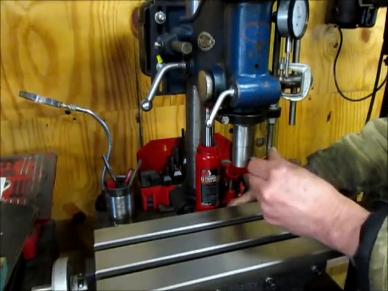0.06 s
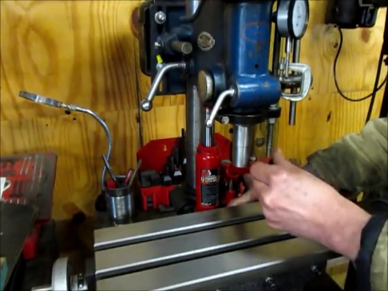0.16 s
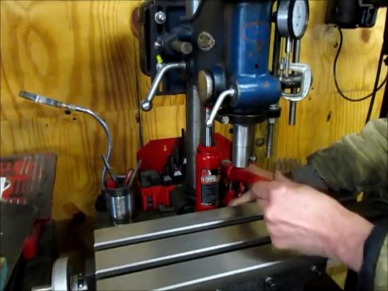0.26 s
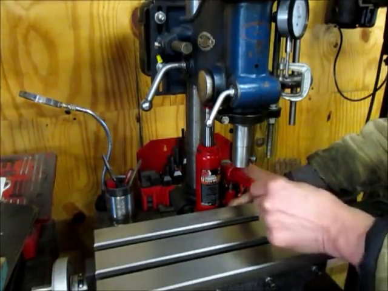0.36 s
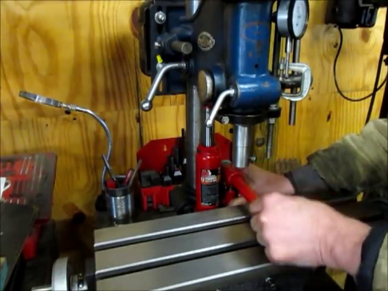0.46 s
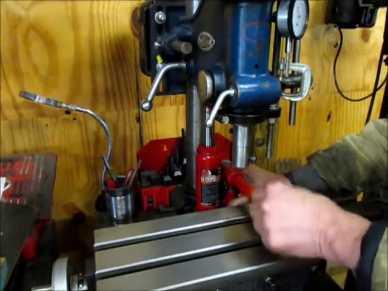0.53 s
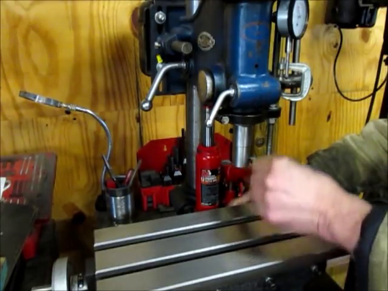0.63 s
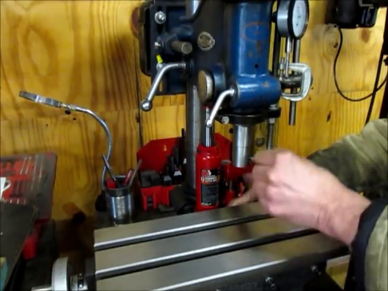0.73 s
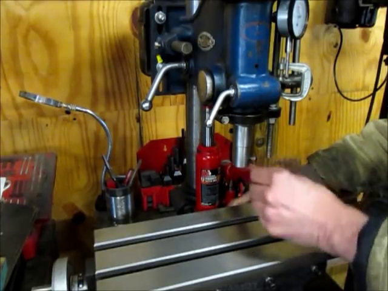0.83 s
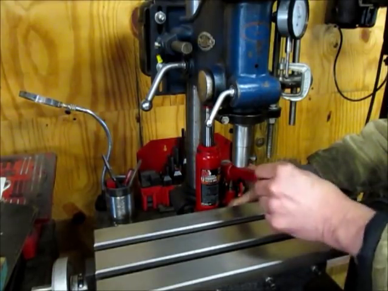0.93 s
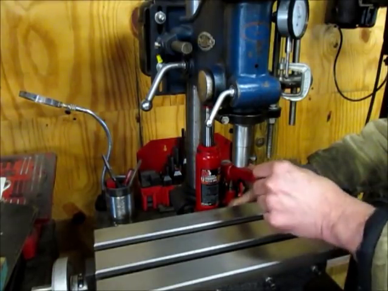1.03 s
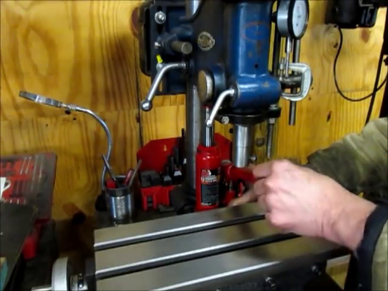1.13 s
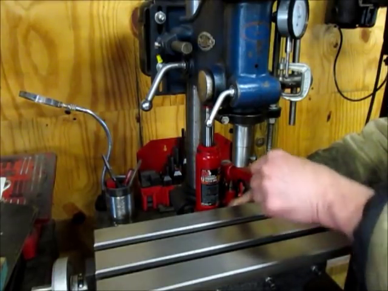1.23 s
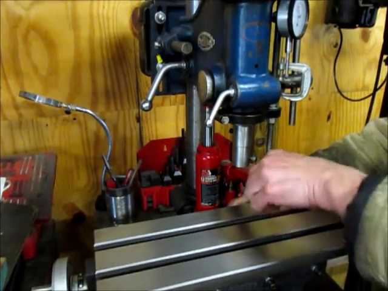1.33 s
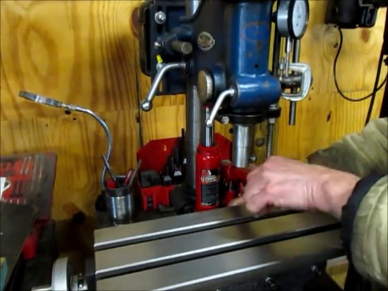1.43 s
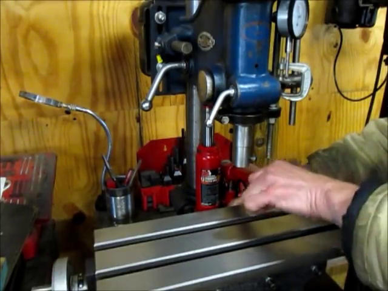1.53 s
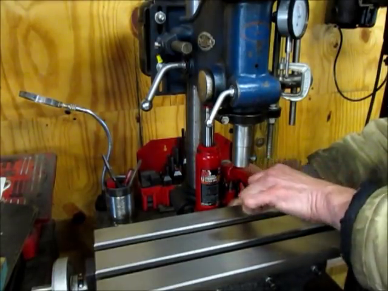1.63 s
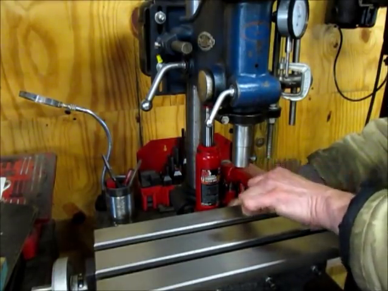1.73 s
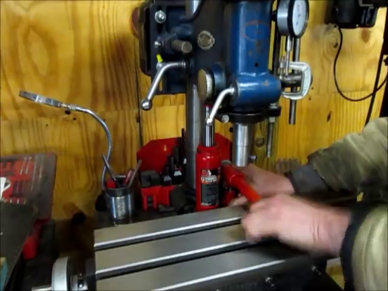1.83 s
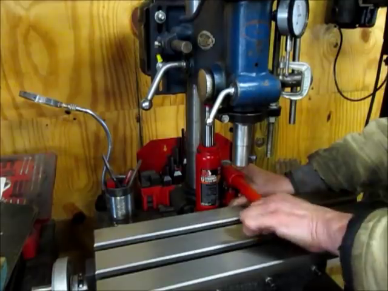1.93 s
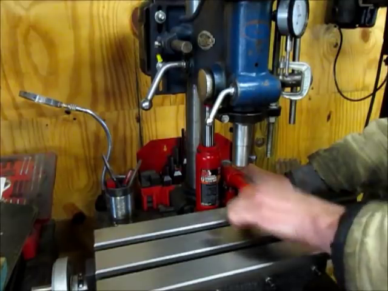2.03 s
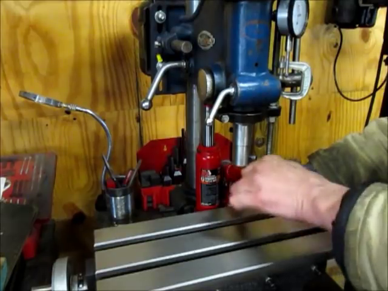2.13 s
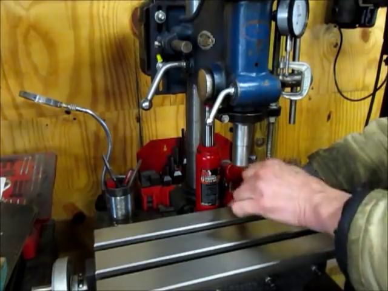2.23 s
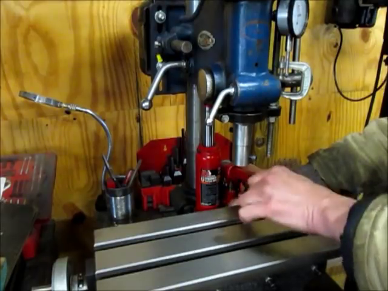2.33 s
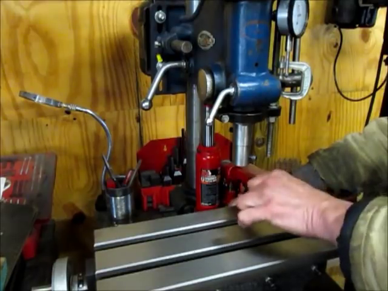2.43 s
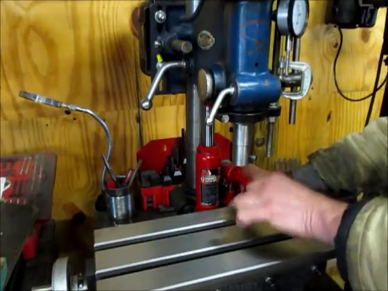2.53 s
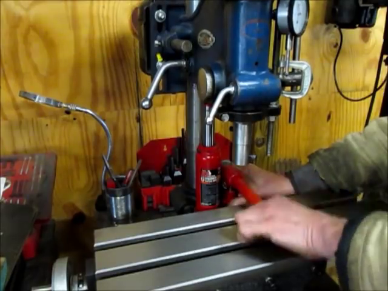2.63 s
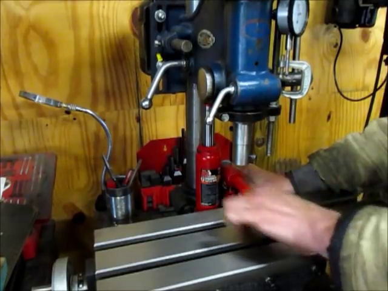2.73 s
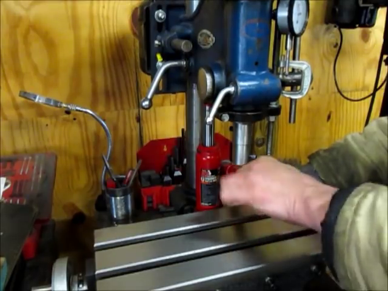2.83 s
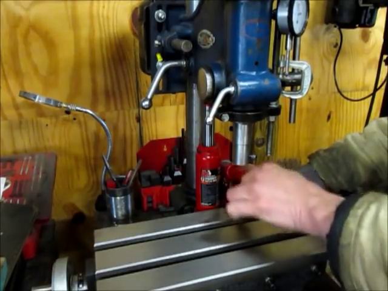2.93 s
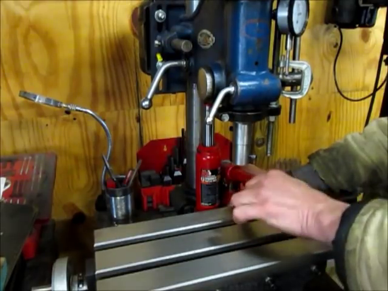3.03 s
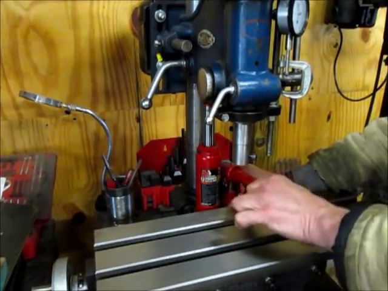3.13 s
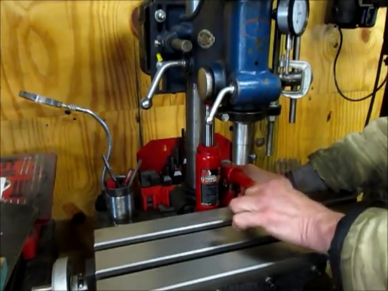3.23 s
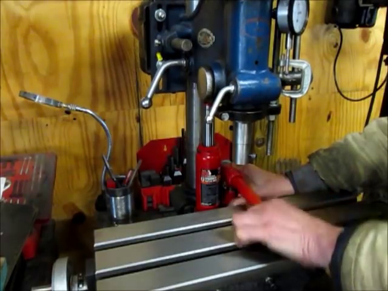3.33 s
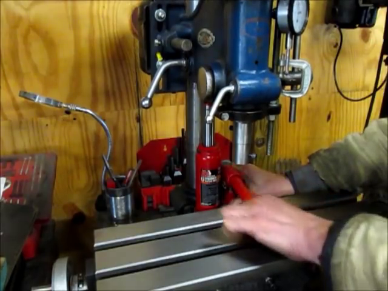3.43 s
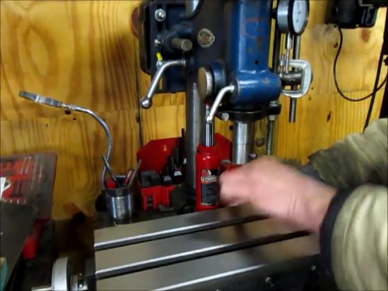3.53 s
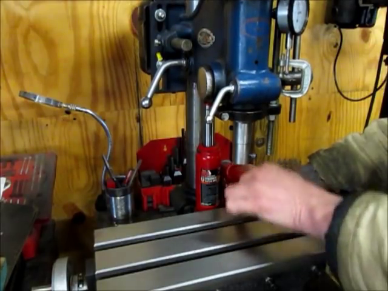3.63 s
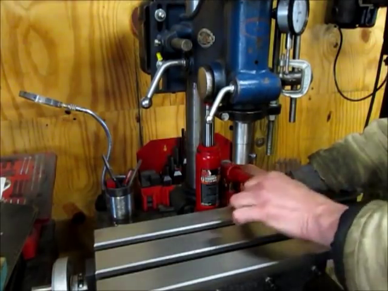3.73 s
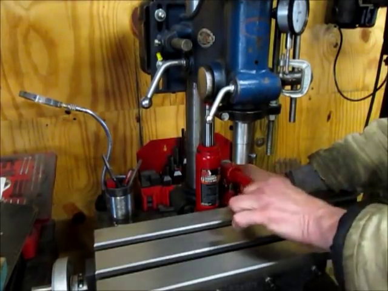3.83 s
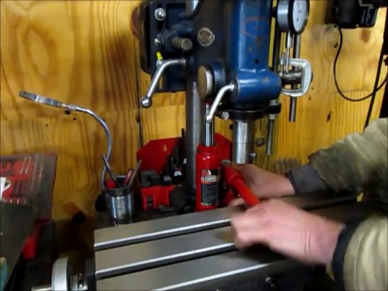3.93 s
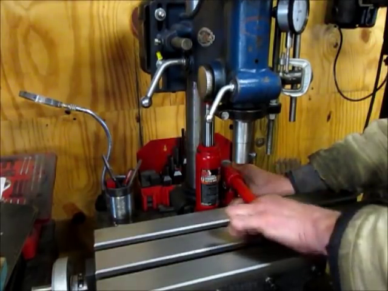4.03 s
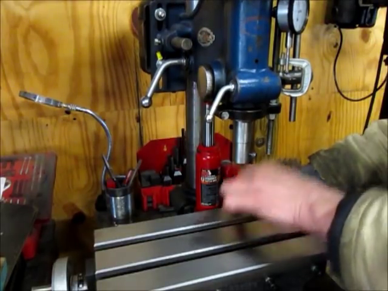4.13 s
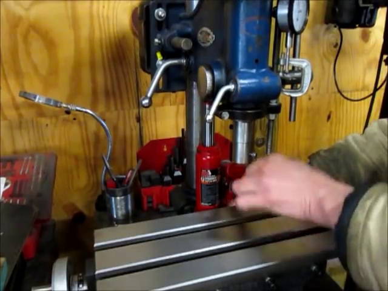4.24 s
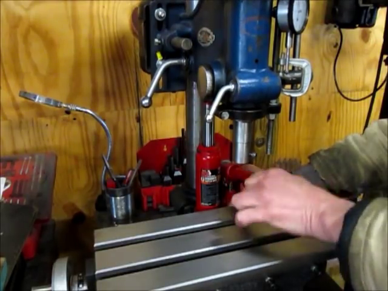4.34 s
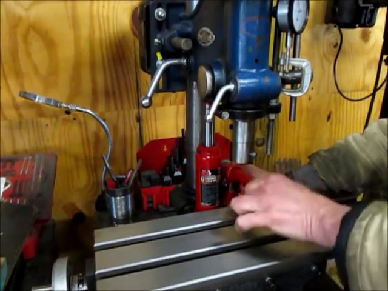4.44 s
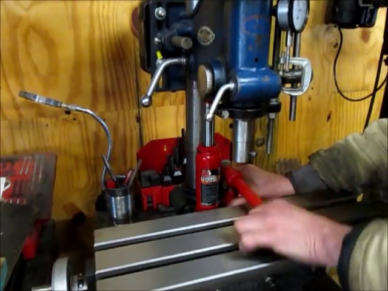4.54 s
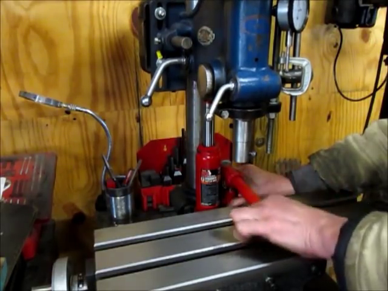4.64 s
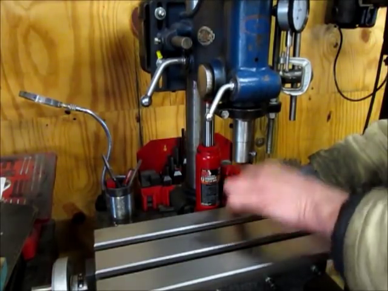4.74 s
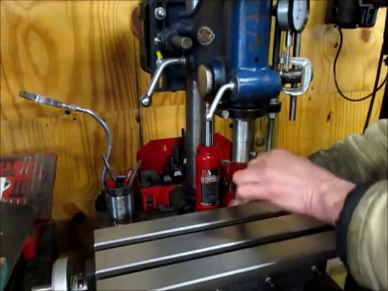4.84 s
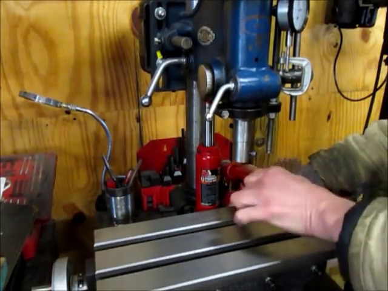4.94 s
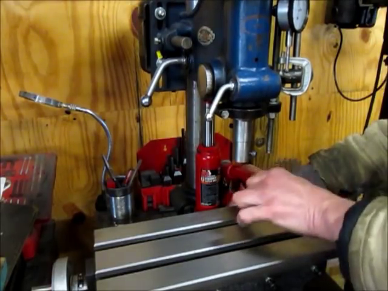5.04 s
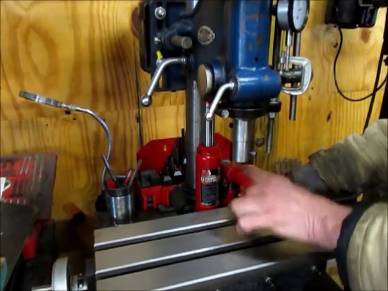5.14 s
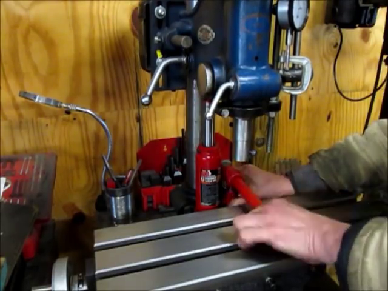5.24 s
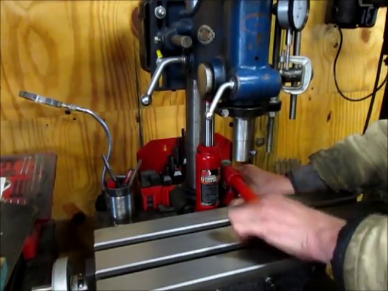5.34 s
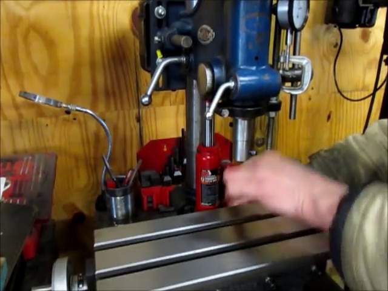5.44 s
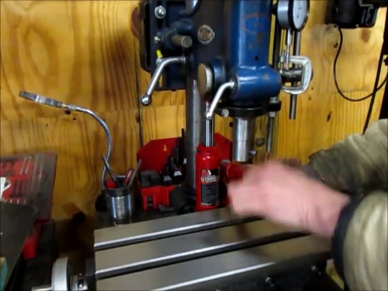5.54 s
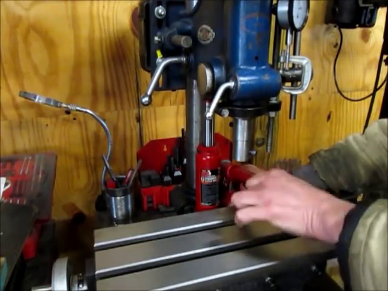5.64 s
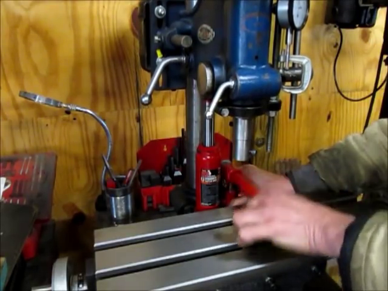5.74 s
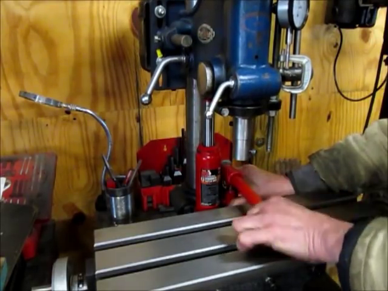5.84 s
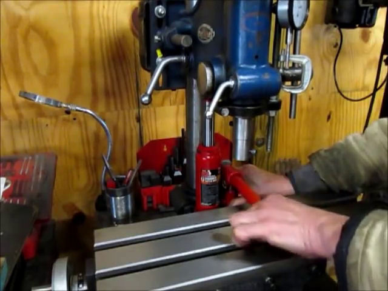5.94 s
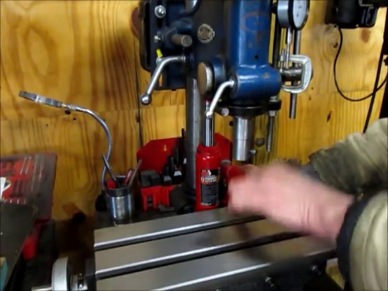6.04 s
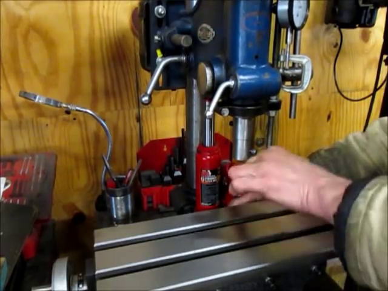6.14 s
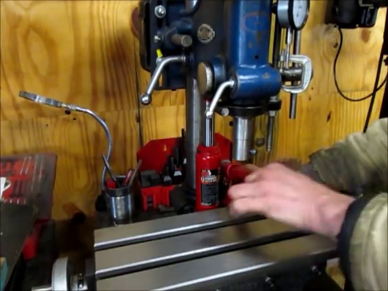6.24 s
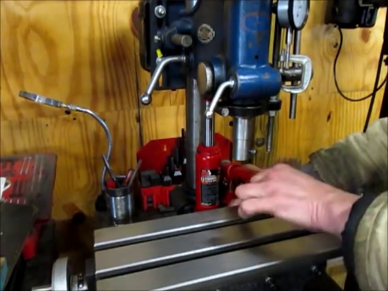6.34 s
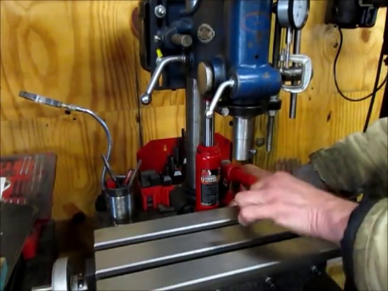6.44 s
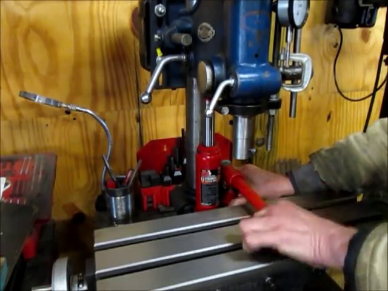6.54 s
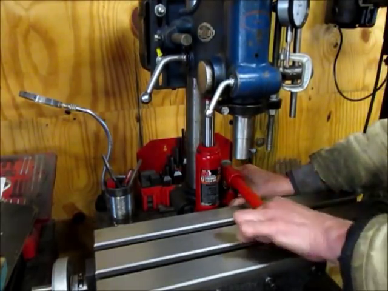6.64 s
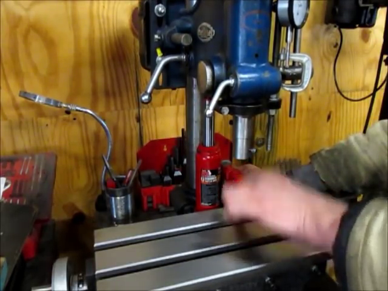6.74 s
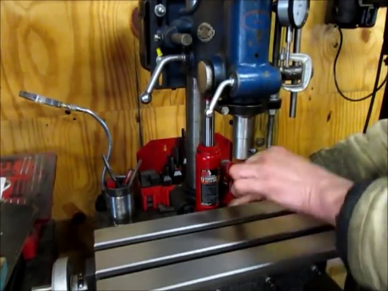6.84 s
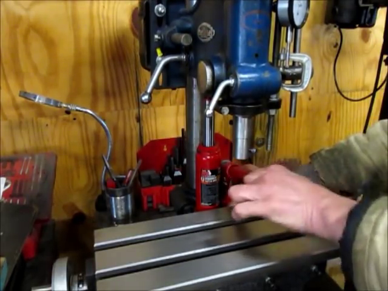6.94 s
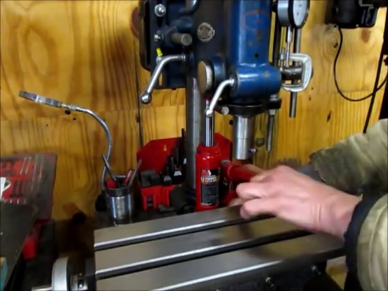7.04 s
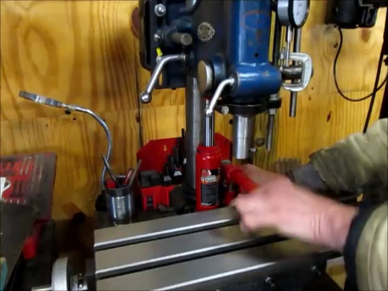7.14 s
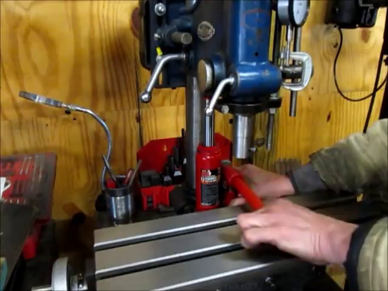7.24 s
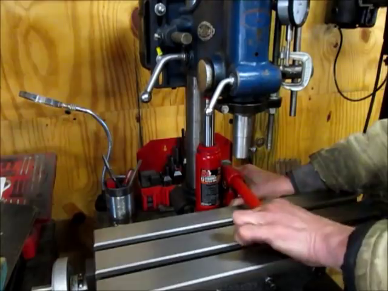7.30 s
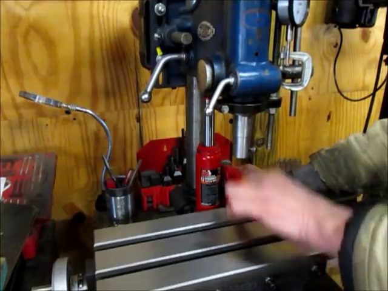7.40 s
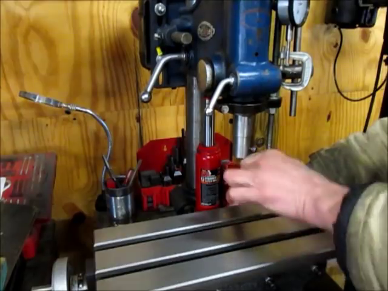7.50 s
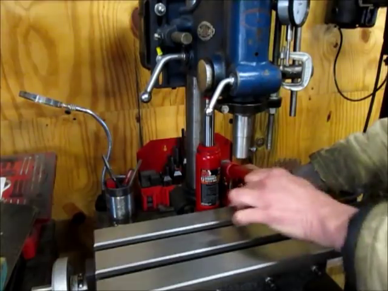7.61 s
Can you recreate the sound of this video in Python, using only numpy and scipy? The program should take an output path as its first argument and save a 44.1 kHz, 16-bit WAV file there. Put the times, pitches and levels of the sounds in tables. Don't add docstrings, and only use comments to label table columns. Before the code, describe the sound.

A hand pumps a small metal jack on a heavy machine bench, dull thuds and sharp metallic clacks with loose rattling between strokes.

```python
import sys
import numpy as np
from scipy import signal
from scipy.fft import rfft, irfft
from scipy.io import wavfile

SR = 44100
rng = np.random.default_rng(int(sys.argv[2]) if len(sys.argv) > 2 else 0)


def gain_from_db(level_db):
    decades = np.asarray(level_db, float) / 20
    return 10 ** decades


def inscribe(sig):
    pcm = np.round(np.clip(np.atleast_2d(sig).T, -1, 1) * 32767)
    wavfile.write(sys.argv[1], SR, pcm.astype(np.int16))


N = 338247
RING = np.arange(SR // 3) / SR

# (frequency [Hz], level [dB], t60 [s])
FRAME = [(290.2, 8.5, 0.34), (359, 17, 0.085), (404, 16.5, 0.068)]
UPPER = [(490.5, -3, 0.4), (536, -0.5, 0.22), (548.5, -3.5, 0.17), (595, -3, 0.073), (631.5, -5.5, 0.061)]
BENCH = [(94.7, 3, 0.32), (161.7, -5, 0.27), (204.3, -2, 0.34), (217.5, 1.5, 0.39)]
BODY = [(714, 2, 0.97), (795, 9.5, 0.035), (912, -7, 0.63), (945, 3, 0.56), (936, 2.5, 0.12),
        (1132, 0.5, 0.28), (1136, -16, 0.16), (1222, -10, 0.19), (1287, -0.5, 0.064), (1325, 1, 0.078)]
LINKS = [(1478, 10, 0.054), (1506, 5, 0.16), (1601, 5.5, 0.061), (1738, 7.5, 0.073), (2034, 10.5, 0.03),
         (2225, 2.5, 0.1), (2395, -1.5, 0.25), (2854, 0, 0.026), (3420, -27, .2)]
PINS = [(3470, -82, .2), (3870, 23.5, 0.47), (4200, 17, 0.025), (4760, 14, 0.17), (4600, -12, .15),
        (4900, -14, 0.13), (5700, -1, .12)]


def fade(t60_s):
    return np.exp(-np.log(1000) * RING / max(t60_s, 0.005))


def ringing(modes, stretch=1):
    return np.array([gain_from_db(db) * fade(t60_s) * np.exp(2j * np.pi * hz * stretch * RING)
                     for hz, db, t60_s in modes])


def spots(count, modes):
    chance = rng.random((count, 2 * len(modes)))
    return gain_from_db(5.9 * chance[:, ::2]) * np.exp(2j * np.pi * chance[:, 1::2])


def band(x, lo_hz, hi_hz, order=2):
    edges_hz = [lo_hz, min(hi_hz, SR * 0.45)]
    return signal.sosfilt(signal.butter(order, edges_hz, "bandpass", fs=SR, output="sos"), x)


def colour(x, points):
    hz, db = np.transpose(points)
    f_hz = np.fft.rfftfreq(len(x), 1 / SR) + 1
    y = irfft(rfft(x) * gain_from_db(np.interp(np.log(f_hz), np.log(hz), db)), len(x))
    return y / y.std()


def push(x, ms):
    return signal.fftconvolve(x, np.sin(np.linspace(0, np.pi, int(ms * SR / 1000) + 3)))[:len(x)]


def onset(rise_s):
    return np.minimum(RING / rise_s, 1)


def add(out, start_s, sound, peak_db):
    rows = np.broadcast_to(sound, (len(start_s), len(RING)))
    for start, row, db in zip(start_s, rows, peak_db):
        i = int(start * SR)
        out[i:i + len(row)] += (row * gain_from_db(db) / np.abs(row).max())[:len(out) - i]


def thuds():
    # (time [s], level [dB], pitch [Hz], bench rocking [dB])
    foot = [
        (1.888, -12, 328, -43),
        (2.638, -9, 329.4, -39),
        (3.353, -33.5, 378, -52),
        (3.9604, -10, 335, -42),
        (4.559, -12.5, 309, -41),
        (5.2322, -12.5, 315.5, -39),
        (6.571, -26.5, 290, -38.5),
        (7.234, -16, 305, -39),
    ]
    # (time [s], level [dB], pitch [Hz], upper modes [dB])
    head = [(0.241, -24.5, 358, -0.5), (0.466, -17.5, 352, 6.5), (0.6, -30.5, 398, 7),
            (0.758, -33, 304, 12.5), (2.325, -19.5, 354, -0.5), (3.015, -21, 376, 12.5),
            (3.715, -23.5, 383, 10), (4.332, -19.5, 353.4, 9.5), (4.949, -18, 359, 11),
            (5.599, -19, 365, 8.5), (6.051, -27.5, 355, 17), (6.232, -21.5, 388, -4), (6.959, -21, 369, 11),
            (7.631, -18.5, 396, 7)]
    # (time [s], level [dB], pitch [Hz], upper modes [dB])
    shifts = [(0.293, -30, 414, -16), (0.839, -34, 320, -15), (0.874, -29.5, 356, -16),
              (1.834, -35, 340, -15), (1.858, -35, 337, -19), (1.953, -29.5, 325, 15),
              (1.997, -25.5, 344, 13), (2.16, -34.5, 311, 17), (2.713, -42, 318, 30),
              (3.442, -32, 389, -12), (4.046, -26, 347, 10.5), (4.14, -32.5, 346, 18.5),
              (4.311, -25, 332, 1), (4.642, -27.5, 317, 16), (4.669, -31, 390, 21), (4.766, -36, 434, 23),
              (5.303, -32, 404, 17.5), (5.343, -36.5, 353, 24), (6.654, -32.5, 322, 21.5),
              (6.702, -39.5, 318, 23), (6.846, -33.5, 363, 14), (7.306, -25.5, 344, 14),
              (7.523, -35, 345, 14.5)]
    out, upper = np.zeros(N), ringing(UPPER)
    boom = band(push(-ringing(BENCH).imag.sum(axis=0), ms=2.4), 52, 350)
    landings = [(s, db, hz, -2.5) for s, db, hz, _ in foot]
    for blows, boom_db in ((landings, -20), (head, -27.5), (shifts, -25)):
        s, db, pitch_hz, upper_db = np.transpose(blows)
        frame = []
        for hz in pitch_hz:
            modes = -ringing(FRAME, hz / 347).imag.sum(axis=0)
            frame.append(band(push(modes, ms=2.895), 0.942 * hz, 1.374 * hz, order=3))
        add(out, s - 0.003, frame * (fade(0.025) + 0.25), db + 1.5)
        top = (spots(len(s), UPPER) @ upper).imag * onset(0.0024) * (fade(0.13) + 0.043)
        add(out, s, band(top, 510, 1060), db + upper_db - 13)
        add(out, s, boom, db + boom_db + 6)
    s, db, hz, sway_db = np.transpose(foot)
    kick = -np.sin(2 * np.pi * hz[:, None] * RING) * onset(0.0023) * fade(0.025)
    add(out, s - 0.0021, kick, db - 7)
    sway = np.sin(2 * np.pi * 33 * RING) * onset(0.1) * fade(1.0) * np.cos(np.pi * RING / RING[-1] / 2)
    add(out, s, sway, sway_db - 1)
    return out


def clacks():
    # (time [s], level [dB], body [dB], treble [dB])
    socket = [(0.5908, -32.5, -3.5, -10), (0.751, -33, -10, -12), (2.305, -30, -7, -6),
              (2.631, -32.5, -2, -8), (2.767, -27, -3.5, -38), (2.8637, -37.5, -4, -5),
              (2.9966, -29, -12, -7), (3.013, -27, -0.5, -14), (3.6885, -35.5, -2, -7),
              (3.9545, -35, -16, -11), (4.1287, -22, -7, -20), (4.3174, -27, -17, -3),
              (4.331, -24.5, 0, -11), (4.629, -47, 10, -15), (4.6405, -33.5, 3, -8), (4.7178, -31, -4, -21),
              (4.8936, -39.5, -1, -12), (4.9342, -31, -3, 6.5), (5.2472, -37, -30, -19),
              (5.4984, -38, 3.5, -19), (6.2286, -29, -9, -1), (6.701, -35, 2, -21),
              (6.8244, -31.5, -14, -11), (6.8461, -21, -14.5, -32), (6.941, -27.5, -9, -10),
              (7.3046, -27.5, 1, -32), (7.523, -25.5, -8.5, -34), (7.6103, -32.5, 1.5, 4)]
    slack = [(0.4675, -37, -8, -17), (0.552, -46, -12, -5), (0.779, -41, -4, -23), (0.8199, -40, -1, -15),
             (0.8412, -41.5, 0, -4.5), (0.8646, -51.5, 12, -19), (1.879, -38.5, 10, -5),
             (1.9, -45, -10, -13), (2.061, -36, -2, -18), (3.265, -63, -8, 0), (3.3, -45, -14, -15),
             (1.9629, -33, 3.5, -10), (2.158, -36.5, -4, -10), (2.193, -41.5, 2.5, -25),
             (2.625, -39.5, 8.5, -10), (2.977, -56, 11, 10), (3.204, -53.5, -12, 7), (3.35, -47, 6, -6),
             (3.4243, -43.5, 8, -12), (3.437, -32, -21, -8), (3.4576, -47, 11.5, -20),
             (3.4913, -31.5, -21, -10.5), (3.948, -37, 5, -8), (4.103, -36, -9, -9),
             (4.1457, -33.5, 3.5, -19), (4.5478, -46, 16, -4), (4.913, -56, -5, 2), (5.227, -41, 10.5, -8),
             (5.3535, -32, -14, -14), (5.5388, -44, 4, -16), (7.228, -49.5, 12.5, -9),
             (7.384, -39.5, 2.5, -3.5)]
    skids = [(0.2399, -42, -0.5, -5), (0.2598, -48.5, 6.5, 3.5), (1.9944, -44, -6, -5), (2.032, -40, 0, -5),
             (2.325, -36, 10, -38), (2.7168, -35.5, 7.5, -6), (4.033, -35.5, 6.5, -26),
             (4.575, -50, -17, -22), (4.6656, -28.5, -1.5, -34), (4.9474, -28, 3.5, -31),
             (5.308, -38, 6.5, -22), (6.023, -34, -12, -5), (6.0338, -27.5, -6, -0.5),
             (6.639, -49, 16, -15), (6.6543, -33, 0.5, -25), (6.733, -38, -21, -22), (6.924, -38, -2, -6),
             (7.2497, -47, -18, -17)]
    valve = [(0.612, -54, -17, 9), (2.0894, -45.5, -3, 3.5), (2.297, -42, -11, -11), (2.697, -39, 2, -9),
             (2.8014, -41, -11, -6), (3.5291, -43.5, -2, 0), (4.302, -31, -1.5, -15), (4.73, -38, -2, -9),
             (4.7445, -34.5, -2, -13), (4.9274, -29, -12, -20), (5.4208, -38, -5, -4),
             (5.5805, -28.5, 0, -10), (6.7692, -35, -3.5, -6), (7.4283, -44.5, -5, 3)]
    slams = [
        (3.713, -18, -8.5, -11.5),
        (5.596, -14.5, -6, -19),
        (6.0488, -15, -8, -24),
        (6.2441, -20.5, -7, -5),
        (6.956, -15.5, -8, -14.5),
        (7.631, -16, -7, -15.5),
    ]
    # (pitch [Hz], fade t60 [s], tick [dB])
    contact = [
        (4130, 0.069, 12),
        (5030, 0.049, 12),
        (4150, 0.11, -13),
        (7770, 0.093, 2),
        (5230, 0.063, 10),
    ]
    out, body, links, pins = np.zeros(N), ringing(BODY), ringing(LINKS), ringing(PINS)
    for blows, (hz, t60_s, tick_db) in zip((socket, slack, skids, valve, slams), contact):
        s, db, body_db, treble_db = np.transpose(blows)
        body_mix, link_mix, pin_mix = (spots(len(s), modes) for modes in (BODY, LINKS, PINS))
        rise = 1 - np.exp(-RING / (0.00042 * gain_from_db(-0.55 * (db[:, None] + 17))))
        noise = rng.standard_normal(rise.shape)
        first = rise * fade(t60_s)
        chatter = noise * (first + 0.026 * rise * fade(0.14))
        damp = rise * (fade(1.62 * t60_s) + 0.015)
        near = gain_from_db(-25 * np.abs(np.log2(np.transpose(PINS)[0] / hz)))
        add(out, s, (body_mix @ body).imag * damp, db + body_db + 2.5)
        add(out, s, band(chatter, 720, 1340), db + body_db + 4)
        add(out, s, (link_mix @ links).imag * damp * rise, db - 2.5)
        add(out, s, band(chatter, 900, 3430, order=3), db - 2)
        bright_db = db + treble_db
        add(out, s, (pin_mix * near @ pins).imag * first * rise, bright_db - 8)
        add(out, s, band(noise * first, hz / 1.13, hz * 1.19), bright_db - 0.5)
        add(out, s, band(chatter, 3000, 7100, order=3), bright_db - 11.5)
        tick = band((RING == 0) + 0.25 * noise * fade(0.011), hz * 0.54, hz * 1.4, order=3)
        add(out, s + 0.00061, tick, bright_db + tick_db + 5.5 + 0.49 * (db + 10.5))
        add(out, s, band(noise * first, 10700, 22000), bright_db + tick_db - 19.5 + 1.1 * (db + 19.5))
    return out


def parts():
    # (frequency [Hz], level [dB], t60 [s])
    ball = [(3560, -1, 0.097), (4900, 1, 0.079), (6900, -1, 0.093), (8500, -12, 0.072),
            (9700, -15.5, 0.079), (10200, -22, .05)]
    pivot = [(2210, -7.5, 0.078), (4253, 4, 0.031), (5520, -0.5, 0.025)]
    catch = [(1470, 0, 0.045), (2140, 1, 0.046), (3210, -1, 0.055), (4090, 5.5, 0.024), (5950, -27, 0.043),
             (9750, -29, .06)]
    sleeve = [(1515, -2.5, 0.047), (2460, -12.5, 0.076), (3773, -9.5, 0.051), (5250, -10.5, 0.026)]
    bottle = [(640, -12, 0.15), (944, 1.5, 0.075), (1190, -16, 0.071), (1456, -7, 0.038),
              (1862, -13, 0.081)]
    cap = [(7080, -3, 0.06), (7550, 7.5, 0.061), (8900, 2, 0.054)]
    # (time [s], level [dB], lowest mode [Hz], tilt [dB/octave])
    ball_rings = [(.612, -48, 3560, 8), (2.0894, -43, 3620, 1), (2.297, -31.5, 3510, 1),
                  (2.8014, -43, 3560, 21), (3.5291, -41, 3530, 21), (3.6883, -38, 3500, 1),
                  (4.302, -28, 3545, 0), (4.9254, -30, 3620, -1), (5.4208, -39, 3480, -4),
                  (5.5785, -27, 3630, -7), (6.765, -40, 3620, 8), (6.941, -33, 3540, 5),
                  (7.4283, -44, 3560, 8)]
    pivot_rings = [(2.3055, -26.5, 2210, -13), (2.697, -35, 2180, 10), (2.9976, -24, 2230, -7),
                   (3.439, -52, 2180, 5), (4.1277, -25, 2260, -10), (4.317, -19.5, 2210, 0),
                   (4.9342, -15, 2205, 1), (6.2326, -17, 2290, 7), (6.8237, -28.5, 2120, -3),
                   (7.384, -44, 2230, 10), (7.611, -23, 2260, 1)]
    catch_rings = [(0.241, -41, 1470, 6), (.7513, -29, 1435, -9), (2.863, -36, 1480, 3),
                   (4.8936, -30, 1420, 6), (4.912, -35, 1470, 7), (5.4968, -33, 1580, 5),
                   (5.5395, -35, 1490, 4), (6.2431, -23, 1464, 4), (6.8461, -23.5, 1515, 1),
                   (7.5234, -32.5, 1536, 3)]
    sleeve_rings = [(.5515, -44, 1515, -6), (.5907, -27.5, 1546, -5), (2.6305, -22, 1380, -13),
                    (5.4984, -27, 1534, -9), (6.0331, -26, 1410, 6), (6.0488, -11, 1502, 1.5),
                    (6.2325, -25, 1510, -5)]
    bottle_rings = [(.468, -25, 640, -22), (.6, -30, 637, -16), (1.879, -30, 786, -5),
                    (2.327, -26, 650, -21), (3.015, -27, 640, 14), (3.351, -48, 640, -2),
                    (3.715, -24.5, 640, 8), (4.033, -25, 605, -5), (4.333, -27, 631, -20),
                    (4.949, -17, 640, -4), (5.598, -16, 647, 1), (6.247, -22, 646, -11),
                    (6.957, -17, 648, 3), (7.309, -31, 640, -7), (7.632, -17.5, 636, -5)]
    cap_rings = [(2.633, -42, 7080, 0), (2.986, -54, 6900, 0), (3.014, -37.5, 7180, 0.0098),
                 (3.2046, -49, 6340, 0), (4.3332, -38, 6850, 0), (6.667, -52, 6660, 0),
                 (7.384, -44, 7170, 0), (7.616, -34, 7200, 0)]
    bench_rings = [(3.349, -41, 93, -6), (5.235, -30, 93.8, -8), (6.576, -37.5, 95.4, 4),
                   (7.238, -32.5, 95.3, -7)]
    out, damp = np.zeros(N), onset(0.0016) * (fade(0.047) + 0.15)
    for modes, blows in ((ball, ball_rings), (pivot, pivot_rings), (catch, catch_rings), (sleeve, sleeve_rings),
                         (cap, cap_rings), (bottle, bottle_rings), (BENCH, bench_rings)):
        lowest_hz = modes[0][0]
        octaves = np.log2(np.transpose(modes)[0] / lowest_hz)
        rings = np.array([(gain_from_db(tilt_db * octaves) @ ringing(modes, hz / lowest_hz)).imag
                          for _, _, hz, tilt_db in blows])
        heavy = lowest_hz < 1000
        s, db = np.transpose(blows)[:2]
        add(out, s, rings * (onset(0.0036) if heavy else damp), db)
    return out


def knocks():
    # (time [s], level [dB], pitch [Hz])
    early = [(1.95, -27, 593), (1.967, -20, 600), (1.991, -22.5, 517), (2.151, -26.5, 700)]
    second = [(2.69, -28, 493), (2.713, -24, 660), (2.777, -20, 532), (2.903, -26.5, 532)]
    third = [(3.349, -30, 987), (3.425, -31, 562), (3.46, -31, 568), (3.539, -24, 568)]
    fifth = [(4.629, -20, 710), (4.644, -23, 560), (4.668, -17, 496), (4.772, -24.5, 536)]
    sixth = [(5.2405, -13.5, 329), (5.312, -17.5, 522), (5.349, -23, 539), (5.386, -31, 640)]
    late = [(6.638, -25, 534), (6.657, -17.5, 573), (6.775, -25, 511), (6.832, -32, 611)]
    out = np.zeros(N)
    s, db, hz = np.transpose(early + second + third + fifth + sixth + late)
    phase = 2 * np.pi * hz[:, None] * RING
    tones = np.sin(phase) + gain_from_db(-5) * np.sin(1.626 * phase) * fade(0.085)
    add(out, s, tones * fade(0.066) * onset(0.001), db - 4)
    return out


def rebounds():
    # (time [s], level [dB])
    jolts = [
        (1.9003, -26),
        (2.6523, -33),
        (3.9764, -27),
        (4.5748, -27),
        (5.2483, -24),
        (6.594, -37),
        (7.2483, -28),
    ]
    out, (s, db) = np.zeros(N), np.transpose(jolts)
    add(out, s, band(push(-1.0 * (RING == 0), ms=1.57), 90, 1500, order=1), db)
    add(out, s, np.sin(2 * np.pi * 2050 * RING) * fade(0.016), db - 8.5)
    return out


def tube():
    # (time [s], level [dB])
    free = [
        (.592, -56.5),
        (6.05, -41),
        (6.847, -51.5),
    ]
    # (frequency [Hz], level [dB], t60 [s])
    tube_modes = [(1450, 3.5, 0.45), (2300, -2, 1), (3070, -6, 0.69), (3640, 0, 0.56), (4230, -1, 0.39)]
    # (time [s], level [dB])
    shivers = [
        (0.258, -52),
        (4.129, -44),
        (4.319, -43),
        (4.937, -37),
        (6.051, -41),
        (6.849, -55),
    ]
    out, (s, db) = np.zeros(N), np.transpose(free)
    for hz, mode_db, t60_s in tube_modes:
        rough = rng.standard_normal((len(s), len(RING))) * fade(t60_s)
        add(out, s, band(rough, hz / 1.026, hz * 1.026), db + mode_db + 5.5)
    s, db = np.transpose(shivers)
    noise = rng.standard_normal((len(s), len(RING)))
    low = band(noise * fade(0.92), 3630, 4600)
    high = band(noise * fade(0.65), 5230, 5470)
    add(out, s, low + gain_from_db(-2) * high, db)
    return out


def grains(rate_hz, spread_db):
    size_db = spread_db * np.minimum(rng.exponential(size=N), 3)
    return (rng.random(N) < rate_hz / SR) * gain_from_db(size_db) * rng.choice([-1, 1], size=N)


def looseness(t60_s, column):
    # (start [s], hold [s], rattle [dB], scrape [dB])
    moves = [(0.0, 0.0079, -37.5, -56), (0.272, 0.029, -39.5, -69), (0.567, 0.13, -43.5, -80),
             (0.802, 0.027, -37.5, -63), (1.273, 0.14, -77, -51), (1.86, 0.23, -31, -44),
             (2.305, 0.025, -34, -43.5), (2.62, 0.23, -30.5, -46), (3.002, 0.031, -32, -48),
             (3.33, 0.0096, -35.5, -62), (3.444, 0.092, -33, -44), (3.71, 0.023, -31.5, -46),
             (3.934, 0.17, -36, -50), (4.215, 0.21, -37.5, -45.5), (4.523, 0.33, -35, -47.5),
             (4.935, 0.013, -26.5, -40), (5.214, 0.23, -31.5, -45), (5.393, 0.21, -33, -47.5),
             (5.58, 0.2, -36, -48.5), (6.127, 0.019, -36, -49), (6.242, 0.014, -33.5, -43.5),
             (6.563, 0.25, -33, -48), (6.945, 0.017, -31, -41), (7.216, 0.21, -34, -52),
             (7.41, 0.13, -35.5, -42.5), (7.624, 0.026, -26.5, -40)]
    gather_s = 0.068
    t_s, power = np.arange(0, N, 64) / SR, 0
    for row in moves:
        rise_db = np.minimum((t_s - row[0]) / gather_s * 20, 0)
        fall_db = 60 / t60_s * np.maximum(t_s - row[0] - row[1], 0)
        power = power + gain_from_db(rise_db - fall_db + row[column]) ** 2
    return np.interp(np.arange(N) / SR, t_s, np.sqrt(power))


def rattle():
    body, links = ringing(BODY).sum(axis=0), ringing(LINKS).sum(axis=0)
    metal = gain_from_db(5.5) * ringing(FRAME).sum(axis=0) + gain_from_db(11) * ringing(UPPER).sum(axis=0) + gain_from_db(-0.5) * body
    metal = band(metal.imag * fade(0.031), 333, 1340)
    dense = signal.fftconvolve(grains(450, spread_db=-1), metal)[:N]
    grit = signal.fftconvolve(grains(600, spread_db=5), (body + links).imag * fade(0.019))[:N]
    mix = gain_from_db(-6) * dense / dense.std() + gain_from_db(-15.5) * grit / grit.std()
    return mix * looseness(t60_s=0.32, column=2)


def scrape():
    # (frequency [Hz], level [dB])
    spectrum = [(900, 2), (1600, 1), (3000, -5.5), (5000, -11.5), (8000, -29), (14000, -41)]
    slide = grains(2200, spread_db=1.5)
    metal = ringing(LINKS).sum(axis=0) + gain_from_db(-23) * ringing(PINS).sum(axis=0)
    rung = signal.fftconvolve(slide, metal.imag * fade(0.026))[:N]
    mix = colour(slide, spectrum) + gain_from_db(-18) * rung / rung.std()
    return gain_from_db(-4) * mix * looseness(t60_s=2.2, column=3)


def shaken(x):
    buzz = band(rng.standard_normal(N), 28.5, 537)
    return x * buzz / buzz.std()


def room(x):
    noise = rng.standard_normal((2, len(RING))) * onset(0.00093)
    low = band(noise[0], 406, 1440) * fade(0.49)
    high = band(noise[1], 930, 10000) * fade(0.6)
    tail = low + gain_from_db(-6.5) * high
    return gain_from_db(-19.5) * signal.fftconvolve(x, tail / np.sqrt(np.sum(tail ** 2)) * 3)[:N]


def shop_hum():
    # (frequency [Hz], density [dB/Hz])
    spectrum = [(15, -61), (25, -22), (32, -7), (45, -28), (69, 0.5), (92, -12), (247, -12), (279, -12.5),
                (349, -13.5), (414, -21), (457, -18.5), (3280, -29.5), (9000, -41), (11700, -49),
                (19800, -120)]
    hum_fade_db_per_s = -0.8
    shop = colour(rng.standard_normal(N), spectrum) * gain_from_db(-50.5)
    drift = gain_from_db(hum_fade_db_per_s * (np.arange(N) - N / 2) / SR)
    return shop + band(shop, 40, 114) * (drift - 1)


def scene():
    low, high = thuds(), clacks() + parts() + knocks() + rebounds()
    echo = room(gain_from_db(-6) * high + gain_from_db(-3) * shaken(high) + gain_from_db(-5.5) * low)
    return np.tile(low + high + tube() + echo + rattle() + scrape() + shop_hum(), (2, 1))


def band_limit(x):
    return signal.sosfilt(signal.butter(12, 16650, fs=SR, output="sos"), x)


def record(dry):
    top_hz, lag_samples, offset = 15830, 0.14, -0.0044
    hiss_points = [(100, 0), (3000, -10), (6000, 1.5), (14000, 0.5), (top_hz, -1), (top_hz + 60, -60)]
    hiss = np.array([colour(rng.standard_normal(N), hiss_points) for _ in dry])
    dry = signal.sosfilt(signal.ellip(8, 0.2, 60, top_hz + 80, fs=SR, output="sos"), dry)
    dry = dry + lag_samples / 2 * np.gradient(dry, axis=1) * np.array([[1], [-1]])
    return band_limit(dry + gain_from_db(-66) * hiss + offset)


dry = scene()
out = record(dry)
inscribe(out)
```